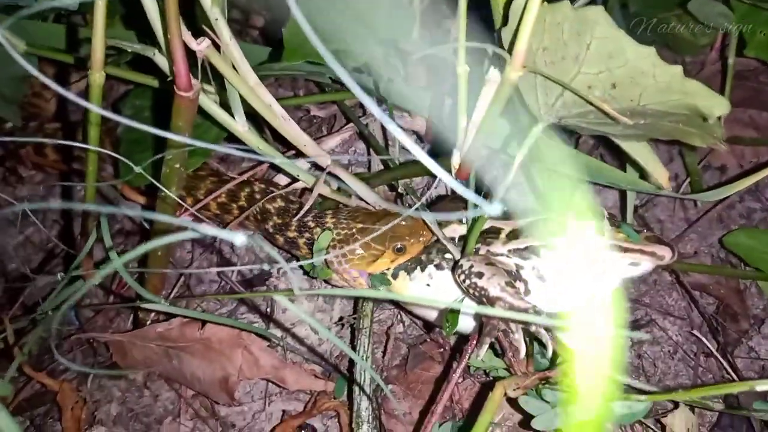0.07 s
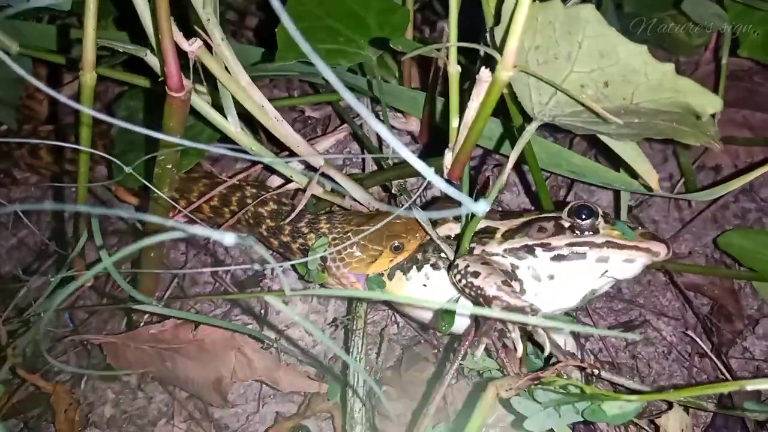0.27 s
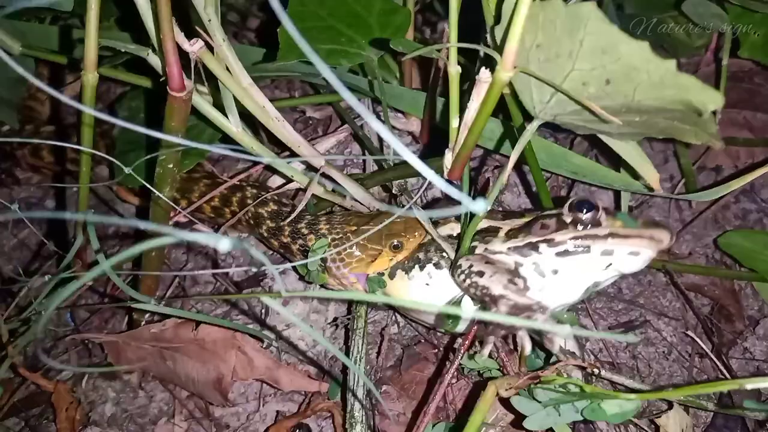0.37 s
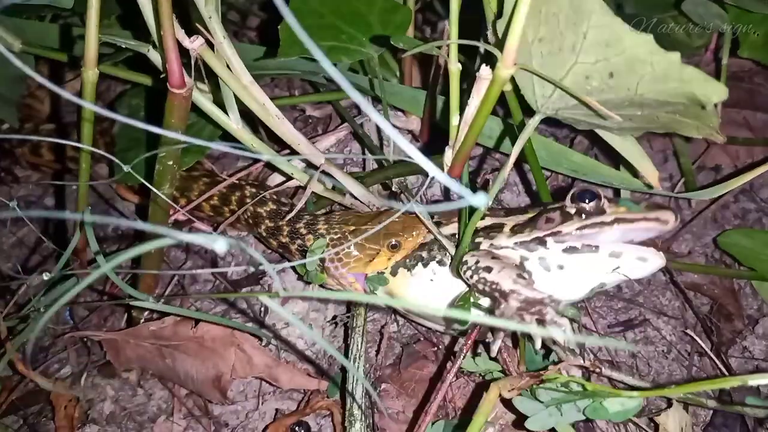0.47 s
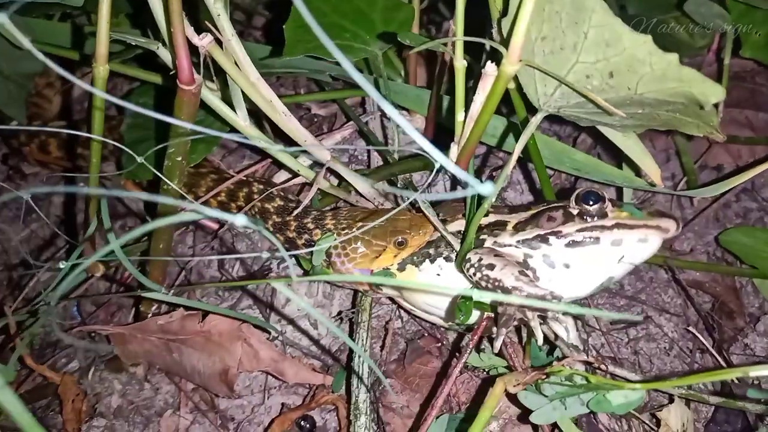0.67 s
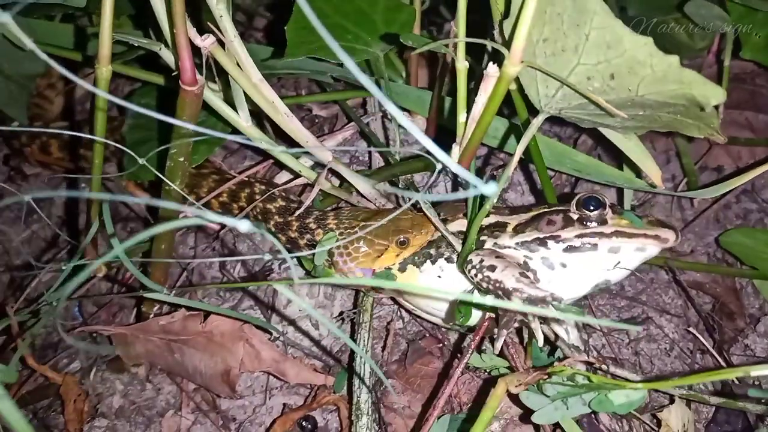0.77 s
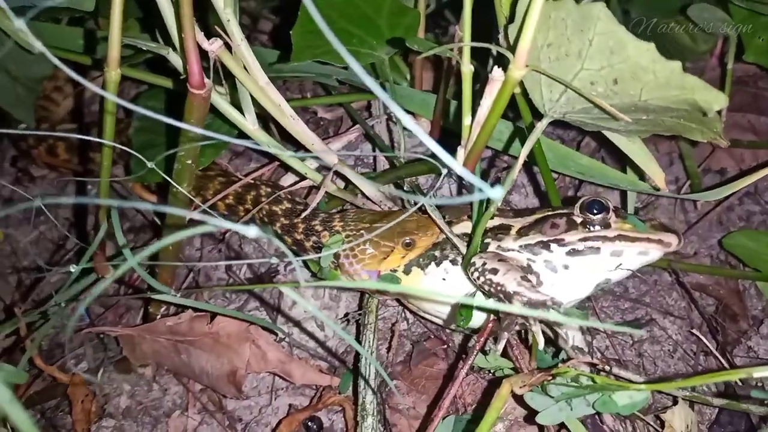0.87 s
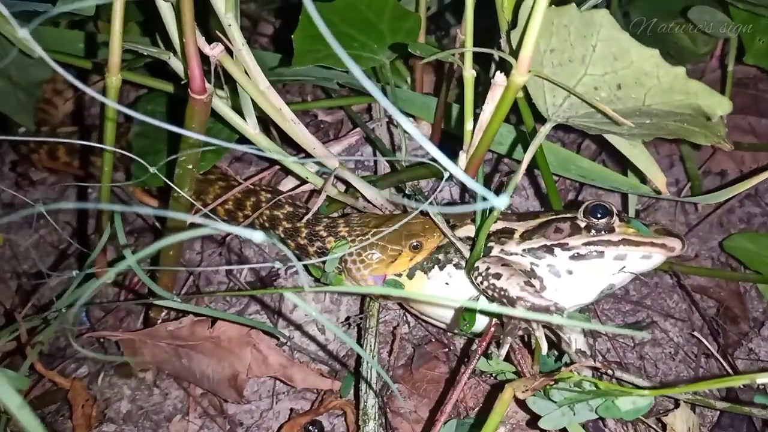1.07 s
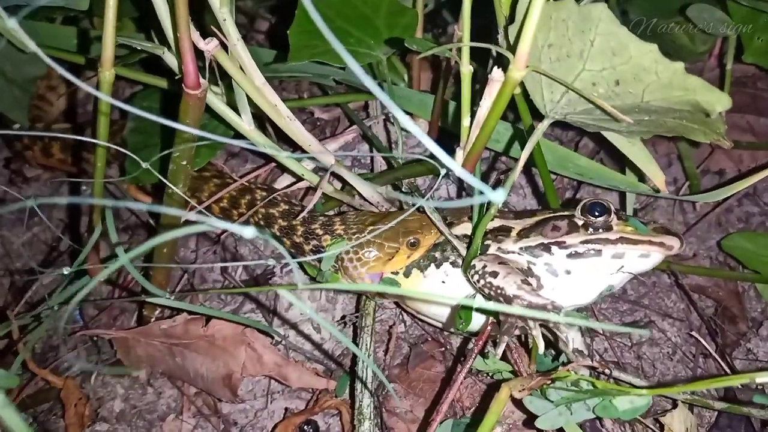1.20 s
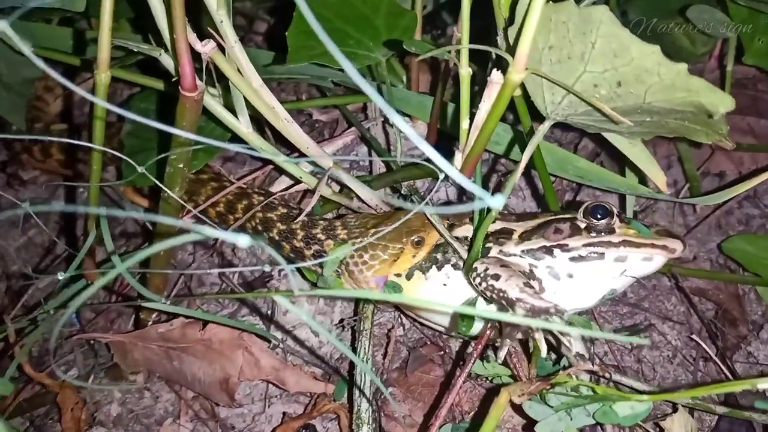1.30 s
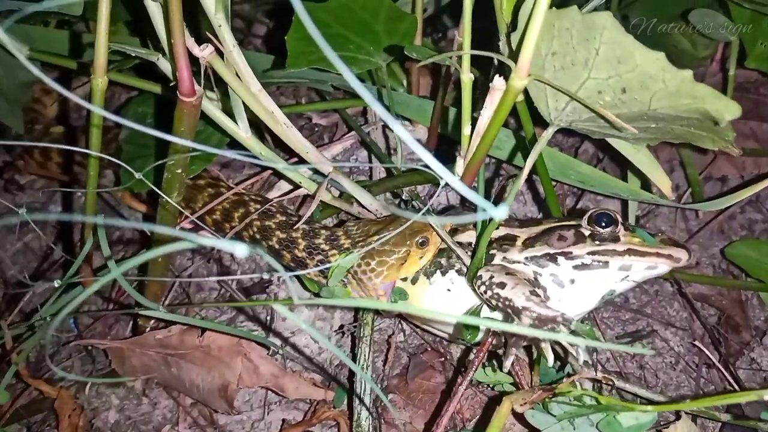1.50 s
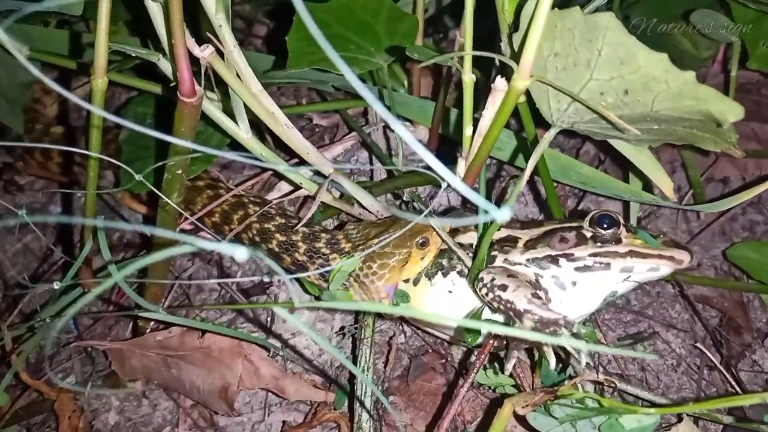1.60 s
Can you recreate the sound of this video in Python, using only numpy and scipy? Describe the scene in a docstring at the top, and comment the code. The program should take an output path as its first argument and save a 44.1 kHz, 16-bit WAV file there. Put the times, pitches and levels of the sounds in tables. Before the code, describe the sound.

One close, buzzing frog cry rises from creaky ticks while crickets chirp in the grass.

```python
"""Crickets chirp in falling sweeps in night grass; then, close by, a frog held by a snake cries once.
Creaky ticks through a shut mouth speed up into a buzzing squeal as the mouth opens, and sink to a low
groan as it shuts. The voice is a source and a filter: pulses of the larynx ring the throat and mouth,
and soil and plants scatter the sound. Behind it lie a far cricket chorus, a thin high trill, ticking
leaves, a distant insect and a low outdoor rumble; a brief burst of mid-pitched hiss comes at the end."""
import sys
import numpy as np
from scipy import signal
from scipy.fft import rfft, irfft, next_fast_len
from scipy.io import wavfile
from scipy.ndimage import uniform_filter1d, minimum_filter1d, map_coordinates

SR = 44100
rng = np.random.default_rng(int(sys.argv[2]) if len(sys.argv) > 2 else 0)


def to_wav(sig):
    """Store sig (one row per channel, or 1-D mono) as 16-bit WAV at the path in sys.argv[1].

    Samples outside -1..1 are clipped; the rate is SR.
    """
    pcm = np.clip(np.atleast_2d(sig), -1, 1) * 32767
    pcm = np.round(pcm).astype(np.int16)
    wavfile.write(sys.argv[1], SR, pcm.T)  # frames by channels


N = 72765

# Vibration of the larynx. Each row: time in seconds, pulse rate in Hz.
PULSE_RATE = [(0.4962, 101), (.52, 125.2), (.548, 183.9), (.567, 205.8), (.595, 294.8), (.612, 374),
              (0.629, 407.8), (.641, 406.6), (0.667, 353.4), (0.689, 298.9), (0.711, 277), (.738, 251.9),
              (.777, 118.8)]
# Strength of the throat pulses. Each row: time in seconds, level in dB.
THROAT_LEVEL = [(.497, -17.5), (.52, -22.5), (.56, -20), (.595, -16.5), (.625, -13), (.665, -8.5),
                (.70, -12.5), (.735, -16), (.76, -18.5), (.777, -27)]
# Throat tension in the cry. Each row: time in seconds, factor on the resonance frequencies.
CRY_TENSION = [(.5, 1.082), (.68, 1.03), (.77, 0.86)]
# The mouth opening and shutting. Each row: time in seconds, pulse level in dB, resonance in Hz,
# sharpness as a factor on the dB slopes.
MOUTH_MOTION = [(.496, -25, 3300, 0.5), (.507, -8.5, 3550, 0.9), (.516, -9.5, 3600, 1.74),
                (.53, -1, 3800, 1.3), (.56, 0.5, 3956, 1.3), (.635, 0, 3800, 1), (.662, 0, 3920, 1.03),
                (.677, -1.5, 3650, 1.88), (.689, -5, 3430, 0.9), (.697, -18, 2920, 0.9),
                (.714, -48, 2850, 0.7)]
# Spectra of the throat, the open mouth and the sharp edge of a mouth pulse.
# Each row: frequency before stretching in Hz, relative level in dB.
THROAT_SPECTRUM = [(105, -46), (180, -24), (300, -21.5), (450, -15), (620, -4), (780, 2), (1100, -4),
                   (1500, -11), (1950, -33.5), (2400, -25), (4000, -32.5), (5500, -71), (12000, -66)]
MOUTH_SPECTRUM = [(500, -68), (1950, -29.5), (2300, -14), (2600, -6), (2950, -14.5), (3300, -3.5),
                  (3700, 3), (4150, 2.5), (4400, -7), (4750, -18), (5800, -30.5), (7200, -40),
                  (10000, -55.5)]
EDGE_SPECTRUM = [(4500, -60.5), (5900, -16), (6800, -7), (7600, -3.5), (10000, -5), (12400, -21),
                 (13400, -11), (15500, -8.5), (19000, -56)]

def cry():
    """Source and filter: each larynx pulse rings the throat and, while it is open, the bright mouth."""
    jitter_s, shimmer_db, glide_s = 4e-6, 0.35, 0.0005
    mouth_hz = 3873  # resonance of the unstretched mouth spectrum
    t = np.arange(PULSE_RATE[0][0], PULSE_RATE[-1][0], 1 / SR)
    cycles = np.cumsum(at(PULSE_RATE, t)[0]) / SR
    throat, mouth, puffs = np.zeros((3, N))
    puff = decay(np.arange(SR // 20) / SR, t60=0.007)  # air escapes after each pulse
    for s in np.interp(np.arange(int(cycles[-1]) + 1), cycles, t):
        s += rng.normal(0, jitter_s)
        shimmer = amp(rng.normal(0, shimmer_db))
        throat_pulse = pulse(THROAT_SPECTRUM, at(CRY_TENSION, s)[0], s)
        add(throat, s, shimmer * amp(at(THROAT_LEVEL, s)[0]) * throat_pulse)
        db, hz, sharpness = at(MOUTH_MOTION, s)
        mouth_pulse = pulse(MOUTH_SPECTRUM, hz / mouth_hz, s, sharpness, glide_s)
        edge = amp(-17.5) * pulse(EDGE_SPECTRUM, 0.97, s, glide_s=glide_s)
        add(mouth, s, shimmer * amp(db) * (mouth_pulse + edge))
        add(mouth, s + glide_s, shimmer * head_ring(s + glide_s))
        add(puffs, s, amp(db) * puff)
    mouth_rasp = amp(-22) * noise(MOUTH_SPECTRUM, waver_db=2, per_s=40)
    edge_rasp = amp(-26) * noise(EDGE_SPECTRUM, waver_db=3, per_s=120)
    return throat + mouth + puffs * (mouth_rasp + edge_rasp)


# Single larynx pulses before the squeal. Each row: start in seconds, level in dB.
CREAK_PULSES = [(0.2074, -32), (.2216, -20.5), (0.2306, -18.5), (0.2413, -17), (0.2536, -16), (.268, -16.5),
                (.289, -15.5), (.3246, -15.5), (0.351, -14), (0.3719, -14), (0.3896, -12.5),
                (0.4057, -12.5), (.421, -14), (0.4424, -14), (.4612, -13.5), (.4758, -13), (0.487, -16.5)]
# Throat tension in the creaks. Each row: time in seconds, factor on the resonance frequencies.
CREAK_TENSION = [(.22, 0.92), (.40, 1.067), (.49, 1.21)]
# Sound escaping as the lips part. Each row: time in seconds, level in dB.
LIP_LEAK = [(.38, -52), (.44, -37), (.487, -15.5)]
# Wet snaps as the mouth opens. Each row: start in seconds, level in dB.
LIP_SNAPS = [(0.4967, -19), (0.507, -20)]
# Spectrum of the parting lips. Each row: frequency before stretching in Hz, relative level in dB.
LIP_SPECTRUM = [(1800, -33), (2400, 7), (4000, -3), (5400, -29), (7500, -12.5), (9300, -2), (11500, -26),
                (14800, -12.5)]

def creaks():
    """Impulse excitation: the larynx snaps open tick by tick behind a nearly shut mouth."""
    out = np.zeros(N)
    for s, db in CREAK_PULSES:
        add(out, s, amp(db) * pulse(THROAT_SPECTRUM, at(CREAK_TENSION, s)[0], s))
        add(out, s, amp(at(LIP_LEAK, s)[0]) * pulse(LIP_SPECTRUM, 1, s))
        add(out, s, amp(rng.normal(0, 2.8)) * head_ring(s))
    for s, db in LIP_SNAPS:
        add(out, s, amp(db) * pulse(LIP_SPECTRUM, 0.96, s))
    return out


# A thin ring, higher while the mouth is open. Each row: time in seconds, level in dB, frequency in Hz.
HEAD_MODE = [(.22, -45, 9400), (.29, -39.5, 9000), (.40, -29, 8950), (.48, -23.5, 8760), (.51, -17, 9500),
             (.68, -15, 9560), (.70, -33, 8840), (.77, -51, 8350)]

def head_ring(s):
    """Damped oscillation: a pulse at time s sets one high mode ringing."""
    db, hz = at(HEAD_MODE, s)
    t = np.maximum(np.arange(SR // 40) - s * SR % 1, 0) / SR
    return amp(db) * rise(t, 0.00038) * decay(t, t60=0.0049) * np.sin(2 * np.pi * hz * t)


def pulse(spectrum, stretch, s, sharpness=1, glide_s=0):
    """Impulse response of a cavity, its resonance frequencies times stretch, its envelope peak 1."""
    size, glide_band_hz = 2048, (3010, 4280)
    hz = np.fft.rfftfreq(size, 1 / SR)
    cepstrum = irfft(np.log(amp(sharpness * along(spectrum, hz / stretch))))
    cepstrum[1:size // 2] *= 2  # folding gives a causal, minimum-phase ring
    cepstrum[size // 2 + 1:] = 0
    # Group delay places the pulse between samples and sweeps it up through the band in glide_s.
    delay = s * SR % 1 + SR * np.interp(hz, glide_band_hz, (0, glide_s))
    ring = irfft(np.exp(rfft(cepstrum) - 2j * np.pi * np.cumsum(delay) / size))
    return ring[:size // 2] / np.abs(signal.hilbert(ring)).max()


# What plants and soil reflect. Each row: frequency in Hz, gain in dB.
REFLECTION = [(400, -12.5), (1500, 2), (5000, -1), (12000, 0)]

def echoes(voice):
    """Diffuse scattering: a short tail from soil and stems, a long faint one from far vegetation."""
    t = np.arange(SR // 2) / SR
    scattered = np.zeros(N)
    for db, t60 in ((-14.5, 0.041), (-30, 0.69)):
        tail = rng.standard_normal(len(t)) * rise(t, 0.00092) * decay(t, t60)
        scattered += amp(db) * signal.fftconvolve(voice, tail / np.linalg.norm(tail))[:N]
    return filtered(scattered, lambda hz: amp(along(REFLECTION, hz)))


# Near crickets. Each row: middle in seconds, frequency there in Hz, relative peak in dB,
# swell width in seconds.
NEAR_CHIRPS = [(0.082, 3018, -31, 0.013), (.148, 3117, -25, 0.011), (0.215, 3042, -23.5, 0.0046),
               (.300, 3165, -28.5, 0.0041), (.351, 3168, -24.5, 0.008), (0.419, 3042, -23.5, 0.0049),
               (0.808, 3036, -26.5, 0.0078), (.837, 3136, -25.5, 0.011), (0.891, 3155, -23, 0.0056),
               (.944, 3006, -34.5, 0.0079), (1.06, 3018, -33, 0.011), (1.118, 3056, -27, 0.0041),
               (1.176, 3046, -23.5, 0.0043), (1.237, 2987, -30, 0.0062), (1.311, 3034, -25, 0.0029),
               (1.361, 3072, -23, 0.0038), (1.466, 3020, -29.5, 0.0069), (1.528, 2940, -29, 0.0047),
               (1.556, 2920, -26.5, 0.0011), (1.594, 3080, -23, 0.0041)]
# Spectra of the far chorus and the high trill. Each row: frequency in Hz, relative level in dB.
CHORUS_SPECTRUM = [(2300, -29), (2650, -18.5), (2800, -15), (2900, -4.5), (3100, -0.5), (3270, -6),
                   (3400, -23), (3550, -28), (4200, -48)]
TRILL_SPECTRUM = [(5700, -13.5), (6000, -28), (6200, -0.5), (6650, -1), (7100, -9.5), (8000, -43)]
# Rise and fall of the far chorus. Each row: time in seconds, gain in dB.
CHORUS_GAIN = [(0, 1.5), (.8, 1.5), (1.0, -6), (1.13, -0.5), (1.27, -5), (1.39, 2.5), (1.5, -4),
               (1.65, 2.5)]

def crickets():
    """Superposition: many far chirps blur into a chorus, under near chirps and a high trill."""
    near = sum(chirp(s, hz, db + 0.5, width_s) for s, hz, db, width_s in NEAR_CHIRPS)
    far_per_s, far = 63, np.zeros(N)
    for k in range(int(far_per_s * N / SR)):
        s = rng.normal(k, 0.5) / far_per_s
        far += chirp(s, hz=rng.normal(2986, 74), db=rng.normal(-44, 2), width_s=0.0065)
    chorus = far + amp(-38) * noise(CHORUS_SPECTRUM, waver_db=2, per_s=12.99)
    swell = amp(at(CHORUS_GAIN, np.arange(N) / SR)[0])
    trill = amp(-61.5) * noise(TRILL_SPECTRUM, waver_db=-0.8, per_s=40)
    return near + swell * chorus + trill


def chirp(s, hz, db, width_s):
    """Stridulation: one wing stroke gives a pure tone that swells and fades as its pitch falls."""
    fall_hz_per_s, length_s = 12900, 0.12
    t = np.clip(np.arange(N) / SR - s, -length_s / 2, length_s / 2)
    swell = np.cos(np.pi * t / length_s) / np.cosh(t / width_s)
    return amp(db) * swell * np.sin(2 * np.pi * (hz * t - fall_hz_per_s * t * t / 2))


# The clearer ticks of dry leaves. Each row: start in seconds, level in dB.
CLEAR_TICKS = [(0.03, -53), (1.1126, -55)]
# Spectrum of a leaf tick. Each row: frequency in Hz, relative level in dB.
LEAF_SPECTRUM = [(3000, -27), (8000, 0.5), (15000, -2)]

def leaves():
    """Damped noise transients: dry leaves tick, a few clearly and many faintly."""
    faint_per_s, envelope = 17, np.zeros(N)
    draws = rng.random((int(faint_per_s * N / SR), 2))
    faint_ticks = [(when * N / SR, -68 + 10 * size) for when, size in draws]
    for s, db in CLEAR_TICKS + faint_ticks:
        add(envelope, s, amp(db) * decay(np.arange(SR // 20) / SR, t60=0.014))
    return envelope * noise(LEAF_SPECTRUM, waver_db=1, per_s=10)


# Spectrum of the closing hiss. Each row: frequency in Hz, relative level in dB.
BURST_SPECTRUM = [(1600, -25), (2450, 1), (4200, -4.5), (5500, -17), (9000, -20), (15000, -33)]

def hiss_burst():
    """Windowed noise: a brief burst of mid-pitched hiss at the end."""
    burst_s, burst_width_s = 1.64, 0.0076
    swell = amp(-39.5) / np.cosh((np.arange(N) / SR - burst_s) / burst_width_s)
    return swell * noise(BURST_SPECTRUM, waver_db=3, per_s=400)


def distant_insect():
    """Amplitude modulation: a narrow band of hiss swells into three soft phrases."""
    phrases_s, half_width_s = (0.95, 1.24, 1.5), 0.05
    centre_hz, half_width_hz = 4980, 300
    t = np.arange(N) / SR
    swell = sum(np.exp(-np.square((t - s) / half_width_s)) for s in phrases_s)
    hiss = filtered(rng.standard_normal(N), lambda hz: np.exp(-((hz - centre_hz) / half_width_hz) ** 2))
    return amp(-65) * swell * unit(hiss)


# Spectrum of the outdoor air. Each row: frequency in Hz, relative level in dB.
AIR_SPECTRUM = [(20, -55), (45, -12.5), (80, 4.5), (150, 2.5), (250, -2.5), (500, -7), (1000, -20),
                (2400, -14), (3900, -14.5), (4500, -23.5), (5700, -38), (7500, -25.5), (10000, -29),
                (11500, -47), (15000, -38)]

def night_air():
    """Ambient noise: a low rumble and faint hiss, with one soft bump, a damped low tone."""
    bump_s, bump_hz = 0.291, 150
    air = amp(-50) * noise(AIR_SPECTRUM, waver_db=0.8, per_s=3.6)
    t = np.arange(SR // 4) / SR
    envelope = amp(-30) * rise(t, 0.0027) * decay(t, t60=0.05)
    add(air, bump_s, envelope * np.sin(2 * np.pi * bump_hz * t))
    return air


def amp(db):
    """Decibels to amplitude ratio."""
    return 10 ** (np.asarray(db) / 20)


def rise(t, time_constant_s):
    """Exponential approach to 1."""
    return 1 - np.exp(-t / time_constant_s)


def decay(t, t60):
    """Exponential damping by 60 dB in t60 seconds."""
    return amp(-60 * t / t60)


def unit(x):
    """Normalisation to rms 1."""
    return x / np.sqrt(np.mean(x ** 2) + 1e-20)


def along(spectrum, hz):
    """Interpolation of a spectrum on a logarithmic frequency axis."""
    frequencies, levels = np.transpose(spectrum)
    return np.interp(np.log(hz + 1), np.log(frequencies + 1), levels)


def at(rows, s):
    """Linear interpolation of each value column at the times s."""
    times, *columns = np.transpose(rows)
    return [np.interp(s, times, column) for column in columns]


def add(track, s, sound):
    """Superposition of a sound on a track from time s."""
    i = max(int(s * SR), 0)
    track[i:i + len(sound)] += sound[:len(track) - i]


def filtered(x, gain):
    """Zero-phase filtering by a gain that depends on frequency."""
    size = next_fast_len(N + SR // 2)
    return irfft(rfft(x, size) * gain(np.fft.rfftfreq(size, 1 / SR)), size)[:N]


def noise(spectrum, waver_db, per_s):
    """Random modulation: coloured noise whose level wavers through per_s values a second."""
    waver = map_coordinates(rng.standard_normal(256), [np.arange(N) * per_s / SR], mode="wrap")
    coloured = filtered(rng.standard_normal(N), lambda hz: amp(along(spectrum, hz)))
    return unit(coloured * amp(waver_db * waver))


def scene():
    """Superposition of the frog and its surroundings, the same in both channels."""
    frog = creaks() + cry()
    mono = frog + echoes(frog) + night_air() + crickets() + distant_insect() + leaves() + hiss_burst()
    return np.array([mono, mono])


def record(dry):
    """Automatic gain control ducks at loud peaks and recovers slowly; a low-pass limits the band."""
    limit_db, recover_db_per_s, top_hz = -5.5, 24.5, 15650
    over_db = np.maximum(20 * np.log10(np.abs(dry).max(0) + 1e-9) - limit_db, 0)
    recovery = recover_db_per_s * np.arange(N) / SR
    duck_db = np.maximum.accumulate(over_db + recovery) - recovery
    gain = uniform_filter1d(minimum_filter1d(amp(-duck_db), size=129), size=129)
    return np.array([filtered(channel * gain, lambda hz: hz < top_hz) for channel in dry])


dry = scene()
out = record(dry)
to_wav(out)
```